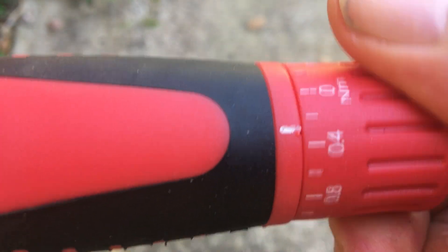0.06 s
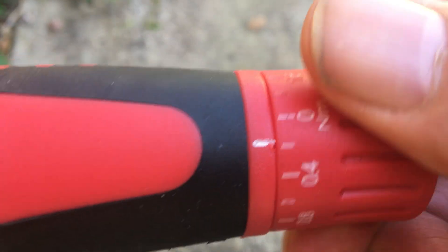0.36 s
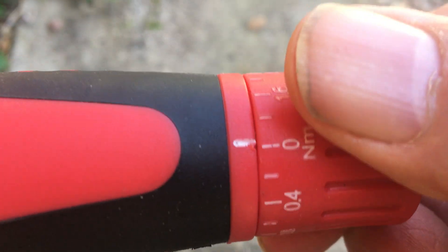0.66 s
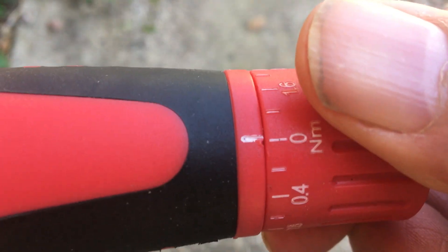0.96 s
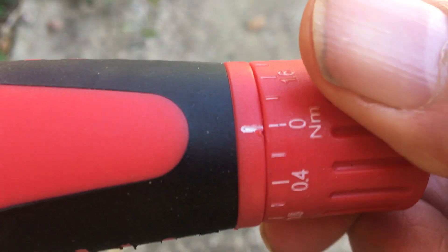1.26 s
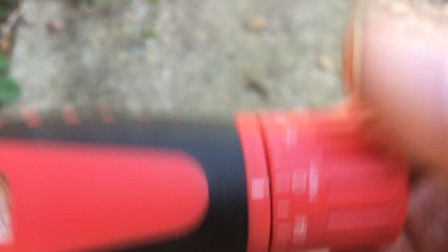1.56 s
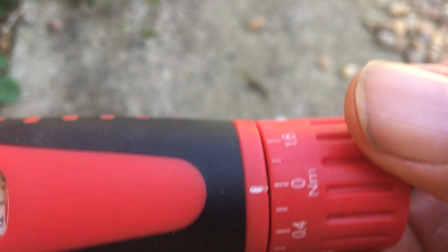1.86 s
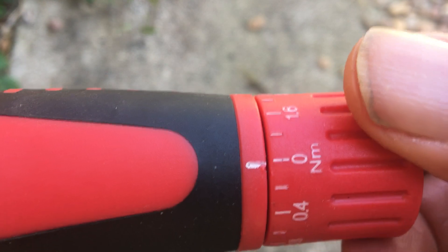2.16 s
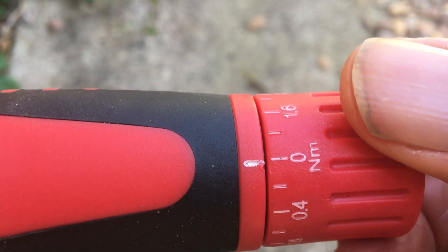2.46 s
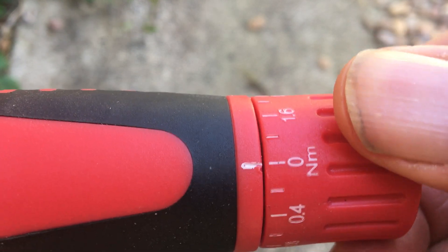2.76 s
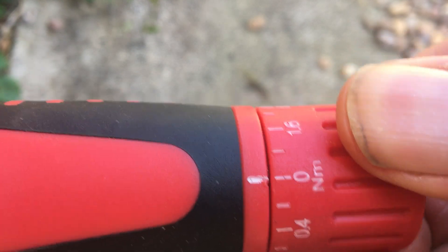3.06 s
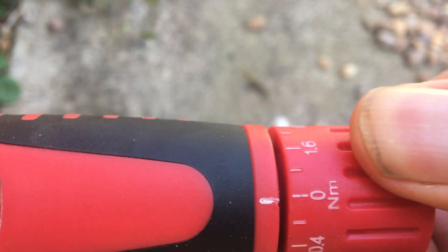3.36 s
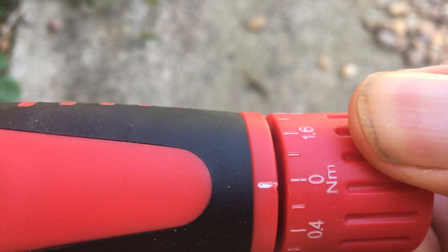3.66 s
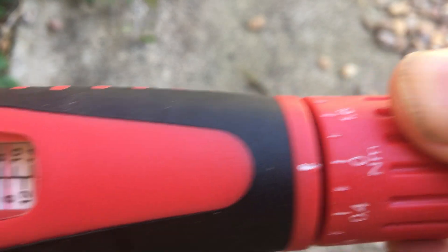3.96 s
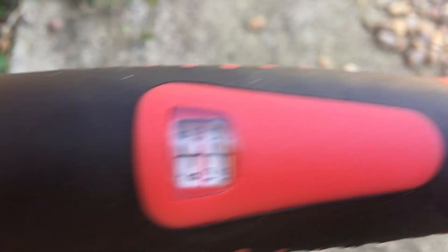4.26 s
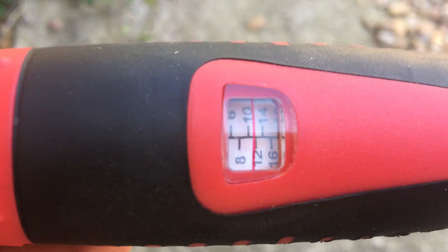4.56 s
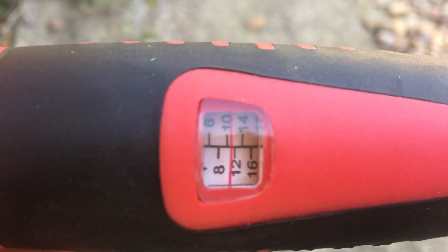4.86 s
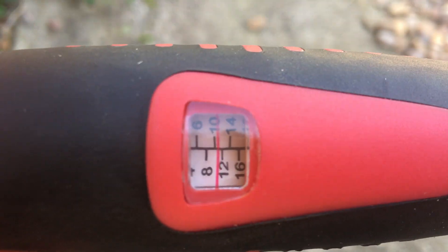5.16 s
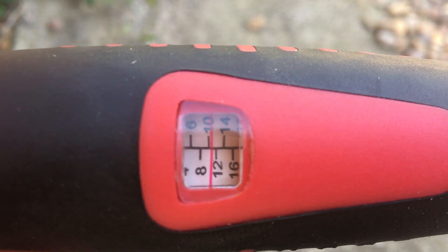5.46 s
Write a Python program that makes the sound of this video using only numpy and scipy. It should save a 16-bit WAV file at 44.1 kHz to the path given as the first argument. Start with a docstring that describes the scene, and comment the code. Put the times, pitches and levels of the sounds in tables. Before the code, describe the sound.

The plastic dial of a torque screwdriver is turned by hand close to the microphone, outdoors, over a steady low rumble of air and distant traffic. From 0.3 to 0.7 seconds come soft, dull finger bumps and a few light ticks, the last with a faint metallic ring, while finches chirp some way off. Around 1.5 seconds the thumb rubs faintly and the dial gives a quick cluster of sharp clicks. A finch's buzzy, sinking wheeze runs from about 1 to 2.3 seconds, then a farther bird repeats very faint falling notes until 3. At 3.3 seconds comes the loudest sound: the dial snaps into its lock with a small thud, and the steel spring inside rings, fading within about a second. A finch trills rapidly from 3.2 to 3.8 seconds. A few faint ticks follow between 4.1 and 4.6, with short runs of chirps until about 5.2.

```python
"""The plastic dial of a torque screwdriver, turned by hand close by, ticks and snaps into its lock.
Each contact rings the plastic handle; the snap jolts the steel spring inside, which rings on.
The thumb rubs the dial and fingers bump the grip. Some way off in the garden, finches chirp, wheeze
and trill in gliding whistles and a farther bird slurs, over a low rumble of air and traffic."""
import sys
import numpy as np
from scipy import signal
from scipy.fft import rfft, irfft, next_fast_len
from scipy.io import wavfile

SR = 44100
rng = np.random.default_rng(int(sys.argv[2]) if len(sys.argv) > 2 else 0)


def to_wav(sig):
    """Store sig (one row per channel, or 1-D mono) as 16-bit WAV at the path in sys.argv[1].

    Samples outside -1..1 are clipped; the rate is SR.
    """
    pcm = np.clip(np.atleast_2d(sig), -1, 1) * 32767
    pcm = np.round(pcm).astype(np.int16)
    wavfile.write(sys.argv[1], SR, pcm.T)  # frames by channels


N = 251370

# thumb strokes on the dial: start_s, length_s, rub_db, faint_tick_db, tick_centre_hz
STROKES = [(0.099, 0.047, -86, -51, 2520), (0.314, 0.019, -86, -45, 2200), (0.624, 0.025, -84, -45, 2500),
           (1.122, 0.077, -80, -50, 3000), (1.469, .11, -65, -49, 2900), (1.571, 0.13, -77, -54, 6400)]


def dial_snap(gap_s=.0015, gap_shrink=.72, rattle_db=-15, loss_db=5.5):
    """The dial slips, hits its lock hard, then rattles, each bounce weaker and sooner."""
    # contacts of the snap: time_s, level_db, centre_hz, focus_db_per_octave
    hits = [(3.30254, -25, 2200, 7), (3.30492, -9.5, 7900, 11), (3.30541, -7.5, 2004, 4),
            (3.30668, -21, 2000, 4.5), (3.30726, -12, 2793, 6.5)]
    bounce = np.arange(3)
    times = hits[-1][0] + np.cumsum(gap_s * gap_shrink ** bounce)
    rattle = [(s, db, 3600, 2) for s, db in zip(times, rattle_db - loss_db * bounce)]
    return amp(-4) * clicks(hits + rattle, damping=1.0, grit_db=-29, grit_t60_s=.02)


def dial_ticks(rebound_s=.0016, rebound_db=-10, faint_per_s=50, spread_db=3, faint_focus_db=8):
    """The turning dial catches and rebounds once; faint ticks scatter under each thumb stroke."""
    # clear ticks and catches: time_s, level_db, centre_hz, focus_db_per_octave
    ticks = [(0.3256, -37.5, 3100, 16), (0.3866, -38, 800, 7), (0.408, -44, 500, 6),
             (0.6765, -36, 2940, -3.5), (1.198, -47.5, 2500, 6), (1.4793, -30.5, 3000, 5),
             (1.538, -28.5, 3070, 13), (1.5834, -34.5, 6400, 29), (1.5866, -32.5, 6350, 32),
             (1.5926, -31, 7000, 49), (1.6166, -31, 6230, 15), (1.657, -43.5, 14000, 11),
             (1.7002, -42, 7760, 41), (3.282, -51.5, 3020, 6), (4.137, -49, 6000, 5.5),
             (4.3093, -45.5, 1500, 0), (4.4921, -45, 9500, 9), (4.5575, -48, 8300, 6)]
    contacts = ticks + [(s + rebound_s, db + rebound_db, hz, focus) for s, db, hz, focus in ticks]
    for start, length, _, db, hz in STROKES:
        count = max(round(length * faint_per_s), 1)
        for k, (place, strength) in enumerate(rng.random((count, 2))):
            s = start + length * (k + place) / count
            contacts.append((s, db + spread_db * (2 * strength - 1), hz, faint_focus_db))
    return amp(-5) * clicks(contacts, damping=1.7, grit_db=-19, grit_t60_s=.006, scatter=.07)


def clicks(contacts, damping, grit_db, grit_t60_s, scatter=0):
    """Each contact is a sharp push that ends in a short crunch of plastic on plastic."""
    out, t = np.zeros(N), clock(.02)
    for s, db, centre_hz, focus_db in contacts:
        force = amp(grit_db - 60 * t / grit_t60_s) * rng.standard_normal(len(t))
        force[0] = 1
        add(out, s, amp(db) * signal.fftconvolve(force, handle(centre_hz, focus_db, damping, scatter)))
    return out


def handle(centre_hz, focus_db, damping, scatter=0):
    """A contact rings the handle's modes near a centre set by its hardness; a firm grip damps them."""
    # modes of the plastic handle: pitch_hz, level_db, t60_s (at damping 1)
    modes = [(480.0, -24, 0.02), (680.0, -24, 0.02), (1190.0, -21, 0.02), (1730.0, -4, 0.016),
             (2190.0, -1, 0.022), (2380.0, -1, 0.013), (3330.0, -2, 0.024), (3920.0, -9, 0.01),
             (4260.0, -7, 0.011), (4710.0, -10, 0.011), (5820.0, -3, 0.009), (6340.0, -9, 0.011),
             (7220.0, -13, 0.008), (8270.0, -14, 0.006), (10470.0, -14, 0.006), (11000.0, -10, 0.006),
             (12700.0, -16, 0.005), (14780.0, -16, 0.005)]
    t = clock(.03)
    hz, db, t60 = np.transpose(modes)[:, :, None]
    hz = hz * (1 + scatter * rng.uniform(-1.2, 1, hz.shape))  # fingers load it differently each time
    weight = amp(db - focus_db * abs(np.log2(hz / centre_hz)))
    ringing = weight * amp(-60 * t * damping / t60) * np.sin(2 * np.pi * hz * t)
    return -ringing.sum(0) / np.linalg.norm(weight)


def spring(pivot_hz=3000):
    """The steel spring rings long; where and how hard it is hit decides which modes speak."""
    # modes of the spring: pitch_hz, t60_s, end_jolt_db, side_pluck_db
    modes = [(1200, 2.2, -31.5, -48), (1513, 0.91, -40.5, -17), (1810, 0.64, -42.5, -31),
             (2036, .85, -38, -13), (2097, 2.35, -23, -49), (2227, 0.44, -38, -12),
             (2541, 0.35, -34.5, -10.5), (2850, .27, -12, -22), (3020, .8, -30, -4.5),
             (3090, 0.081, -3.5, -43), (3250, 1.085, -17, -25), (3284, 0.25, -11.5, -20),
             (3366, .2, -4, -42), (3951, 0.34, -17, -40), (4040, .6, -31, -43), (4350, .5, -38, -38),
             (4800, 0.13, -27, -20), (6510, 0.23, -23.5, -40), (7500, 0.04, -19.5, -7),
             (10940, 0.3, -49, -44)]
    # blows on the spring: time_s, level_db, side_share (0-1), brightness_db_per_octave
    blows = [(0.0, -67, 1, -16), (0.115, -70, 1, -23), (0.6764, -47, 1, 0), (3.305, -29.5, 0, 0)]
    out, t = np.zeros(N), clock(1.3)
    for s, db, side, bright_db in blows:
        for hz, t60, end_db, side_db in modes:
            level_db = db + (1 - side) * end_db + side * side_db + bright_db * np.log2(hz / pivot_hz)
            add(out, s, amp(level_db - 60 * t / t60) * np.sin(2 * np.pi * hz * t))
    return out


def thumb_rub(slips_per_s=9000, gain_db=-2):
    """A dense stream of tiny slips hisses through the handle, swelling and fading with each stroke."""
    slips = rng.standard_normal(N) * (rng.random(N) < slips_per_s / SR)
    envelope = np.zeros(N)
    for start, length, db, *_ in STROKES:
        add(envelope, start, amp(db + gain_db) * np.sin(np.pi * clock(length) / length))
    body = handle(centre_hz=10000, focus_db=7, damping=6.8)
    return envelope * unit(signal.fftconvolve(slips, body)[:N])


def finger_bumps(sag=.65, sag_s=.0088, attack_s=.0024):
    """Dull pushes on the grip whose pitch sags as the flesh relaxes."""
    # bumps of fingers and hand: start_s, level_db, final_pitch_hz, t60_s
    bumps = [(0.354, -38, 55, 0.18), (0.3848, -28.5, 348, 0.012), (0.406, -26.5, 75.4, 0.081),
             (0.409, -36, 334, 0.019), (0.437, -28.5, 57.7, 0.088), (0.5088, -22, 68.4, 0.034),
             (0.568, -32.5, 67, 0.084), (0.646, -33.5, 53, 0.077), (3.304, -28.5, 56, 0.11),
             (3.305, -29, 138, 0.04), (4.309, -41, 940, 0.019)]
    out, t = np.zeros(N), clock(.25)
    for s, db, hz, t60 in bumps:
        envelope = amp(db - 60 * t / t60) * (1 - np.exp(-t / attack_s))
        add(out, s, -envelope * tone(hz * (1 + sag * np.exp(-t / sag_s))))
    return out


def wheezes(buzz_hz=160, jitter=.0193, crack_db=-7.5, crack_at_s=.99, crack_width_s=.2):
    """A finch's wheeze is a fast buzz of downward sweeps; it climbs, drops, swells and sinks."""
    # the wheezes: start_s
    starts = [1.04, 5.405]
    # contour of every wheeze: offset_s, pitch_hz, level_db, buzz_swing (share of the pitch)
    contour = [(0, 4750, -85, .01), (.15, 5800, -70.5, 0.094), (.215, 6625, -66.5, 0.061),
               (.255, 4235, -65, 0.17), (.67, 4050, -51.5, 0.14), (.92, 3823, -51.5, .09),
               (1.15, 3303, -62.5, 0.16), (1.229, 3340, -78, 0.13)]
    out = np.zeros(N)
    times, *columns = np.transpose(contour)
    t = clock(times[-1])
    hz, db, swing = (np.interp(t, times, column) for column in columns)
    crack = amp(crack_db) * np.exp(-((t - crack_at_s) / crack_width_s) ** 2)
    for start in starts:
        cycle = np.cumsum(buzz_hz * (1 + .096 * drift(len(t), 36))) / SR % 1
        pitch = hz * (1 + swing * np.cos(np.pi * cycle) + jitter * drift(len(t), 448))
        # at full effort the voice cracks: rough tones at half and one and a half times its pitch
        half = pitch / 2 * (1 + .162 * drift(len(t), 590))
        voice = tone(pitch) + crack * (tone(half) + amp(-14.5) * tone(pitch + half))
        add(out, start, amp(db) * np.sin(np.pi * cycle) * voice)
    return out


def chirps(fall_ratio=1.48, bend=4.0, waver=.023, gain_db=-5):
    """Each finch chirp drops fast, then levels out in pitch."""
    # runs of chirps: start_s, spacing_s, notes, last_note_db, swell_db, final_pitch_hz, note_length_s
    runs = [(0.177, 0.083, 2, -69, 1, 3420, 0.017), (0.485, .062, 2, -61, 5.5, 3400, .016),
            (0.638, 0.065, 4, -53, 3, 3420, 0.014), (4.209, .0825, 3, -51.5, 10, 3726, .029),
            (4.801, .0805, 5, -61, 2, 3710, .027)]
    out = np.zeros(N)
    for *run, hz, length in runs:
        progress = clock(length) / length
        envelope = np.sin(np.pi * progress ** 1.28)  # peaks late in the note
        for s, db in run_of_notes(*run):
            pitch = hz * fall_ratio ** np.exp(-bend * progress) * (1 + waver * drift(len(progress), 330))
            add(out, s, amp(db + gain_db) * envelope * tone(pitch))
    return out


def trill(gain_db=-7, uneven_db=1.0):
    """A finch whips out short, steep notes in quick runs, slightly uneven in level."""
    # runs of the trill: start_s, spacing_s, notes, last_note_db, swell_db, final_pitch_hz
    runs = [(3.227, 0.026, 3, -52, 13, 3800), (3.387, 0.024, 7, -49.5, 6.5, 4100),
            (3.567, 0.033, 3, -51, -3, 3630), (3.679, .031, 4, -54, -5.5, 4350),
            (3.791, 0.021, 3, -63.5, -2, 5700)]
    out = np.zeros(N)
    for *run, hz in runs:
        for s, db in run_of_notes(*run):
            gain = amp(db + gain_db + uneven_db * rng.standard_normal())
            add(out, s, gain * sweep(top_hz=7400, end_hz=hz, length_s=.009, waver=.025))
    return out


def slurs(start_s=2.298, spacing_s=.1172, count=7, peak_db=-70.5, ends_db=-8.5):
    """A farther bird slurs low notes at a slow, even pace, loudest in the middle of the series."""
    out = np.zeros(N)
    for k, place in enumerate(np.linspace(-1, 1, count)):
        note = sweep(top_hz=3550, end_hz=1607, length_s=.034, waver=.024)
        add(out, start_s + k * spacing_s, amp(peak_db + ends_db * place ** 2) * note)
    return out


def sweep(top_hz, end_hz, length_s, waver):
    """A whistled note that slides straight down, a little unsteadily."""
    progress = clock(length_s) / length_s
    pitch = (top_hz + (end_hz - top_hz) * progress) * (1 + waver * drift(len(progress), 500))
    return np.sin(np.pi * progress) * tone(pitch)


def run_of_notes(start, spacing, notes, last_db, swell_db):
    """Times and levels of evenly spaced notes that swell or fade, then level out."""
    k = np.arange(round(notes))
    return zip(start + spacing * k, last_db - swell_db * (1 - k / max(k[-1], 1)) ** 2)


def near_echo(x):
    """The yard round the hands answers with a faint, short tail."""
    # decay of the tail: band_hz, t60_s
    decay = [(200, .2), (1500, 0.18), (3500, .17), (7000, 0.18), (15000, 0.11)]
    return amp(-19.5) * echo(x, decay, delay_s=.005)


def garden(x, direct_db, wet_db):
    """A distant call arrives with a few single echoes and a wash scattered by leaves."""
    # echoes off ground and walls: delay_s, level_db
    bounces = [(.0011, -36), (.0047, -8.5), (.012, -18), (0.021, -37)]
    # decay of the wash: band_hz, t60_s
    decay = [(1000, .5), (4000, 0.31), (8000, 0.14)]
    out = x.copy()
    for delay, db in bounces:
        add(out, delay, amp(db) * x)
    return amp(direct_db) * out + amp(wet_db) * echo(x, decay, delay_s=.0065)


def air_and_traffic(air_db=-53.5, swell_db=2.5, bass_edge_hz=250):
    """A bed of outdoor noise with broad humps of far traffic; the bass swells unevenly."""
    # spectrum of the outdoor air: frequency_hz, relative_density_db
    spectrum = [(15, -35), (25, -8.5), (59, 1), (108, -5.5), (195, -12), (285, -15.5), (317, -20.5),
                (659, -26), (1100, -22), (1560, -29.5), (2760, -40.5), (3520, -41), (3820, -43.5),
                (4610, -46.5), (16000, -53.5)]
    # bands of traffic hum: centre_hz, width_hz, level_db
    traffic = [(55, 20, -63.5), (182, 60, -64.5), (695, 190, -66), (1096, 270, -67.5)]
    f = np.fft.rfftfreq(N, 1 / SR)
    coloured = lambda gain: unit(irfft(rfft(rng.standard_normal(N)) * gain, N))
    bed = amp(air_db) * coloured(amp(read(spectrum, f)))
    for hz, width, db in traffic:
        bed += amp(db) * coloured(np.exp(-((f - hz) / width) ** 2))
    bass = irfft(rfft(bed) * np.exp(-(f / bass_edge_hz) ** 2), N)
    return bed + bass * (amp(-swell_db * drift(N, 4.7)) - 1)


def echo(x, decay, delay_s):
    """Sends x through a diffuse tail of energy 1 whose bands die at their own speeds."""
    hz, t, bands = signal.stft(rng.standard_normal(SR // 2), SR, nperseg=256)
    tail = signal.istft(bands * amp(-60 * t / read(decay, hz)[:, None]), SR, nperseg=256)[1]
    tail = np.concatenate([np.zeros(int(delay_s * SR)), tail])
    return signal.fftconvolve(x, tail / np.linalg.norm(tail))[:N]


def tone(hz):
    """A sine along a pitch curve."""
    return np.sin(2 * np.pi * np.cumsum(hz) / SR)


def drift(size, hz):
    """Random motion of rms about 1, rolling off above hz."""
    span = next_fast_len(size + 4096)
    f = np.fft.rfftfreq(span, 1 / SR)
    return unit(irfft(rfft(rng.standard_normal(span)) * np.exp(-(f / hz) ** 2), span))[:size]


def high_pass(x, hz):
    """Sheds the bass below hz."""
    return signal.sosfilt(signal.butter(2, hz, "highpass", fs=SR, output="sos"), x)


def amp(db):
    """Decibels to gain."""
    return 10 ** (np.asarray(db) / 20)


def unit(x):
    """Scales to rms 1."""
    return x / np.sqrt(np.mean(x ** 2) + 1e-20)


def read(points, hz):
    """Reads a table on a log-frequency axis."""
    f, value = np.transpose(points)
    return np.interp(np.log(hz + 1), np.log(f + 1), value)


def clock(seconds):
    """Sample times from zero."""
    return np.arange(int(seconds * SR)) / SR


def add(mix, s, sound):
    """Mixes a sound in at time s."""
    part = mix[max(round(s * SR), 0):][:len(sound)]
    part += sound[:len(part)]


def scene():
    """The tool is close and nearly dry; the farther a bird, the more of it arrives as wash."""
    plastic = dial_snap() + dial_ticks() + thumb_rub()
    plastic = high_pass(plastic, hz=875)  # so small a body radiates little bass
    tool = plastic + near_echo(plastic) + spring() + finger_bumps()
    birds = garden(chirps(), direct_db=1, wet_db=-9)
    birds += garden(wheezes(), direct_db=-1, wet_db=-6)
    birds += garden(trill(), direct_db=2.5, wet_db=-2.5)
    birds += garden(slurs(), direct_db=1, wet_db=-1)
    return (tool + birds + air_and_traffic())[None]


def record(dry, low_cut_hz=38, high_cut_hz=15900):
    """The microphone sheds the deepest bass; a steep filter trims the highest treble."""
    band_limit = signal.firwin(511, high_cut_hz, window=("kaiser", 9), fs=SR)
    return signal.oaconvolve(high_pass(dry, low_cut_hz), band_limit[None], "same")


dry = scene()
out = record(dry)
to_wav(out)
```